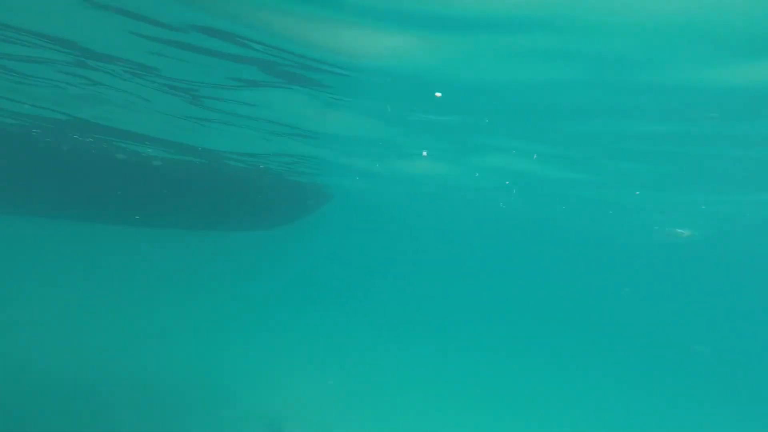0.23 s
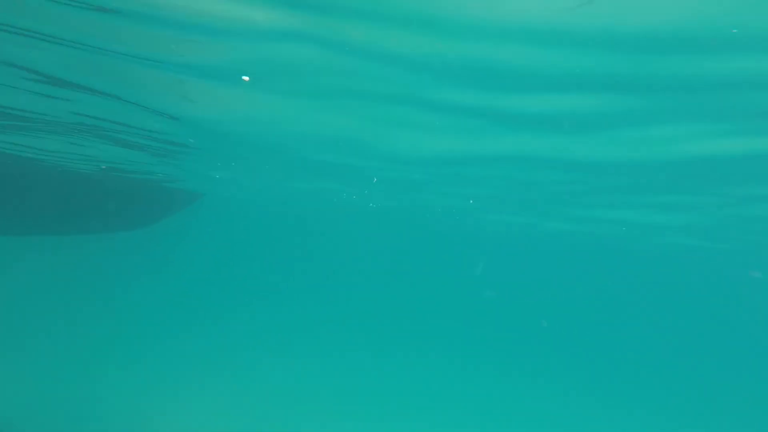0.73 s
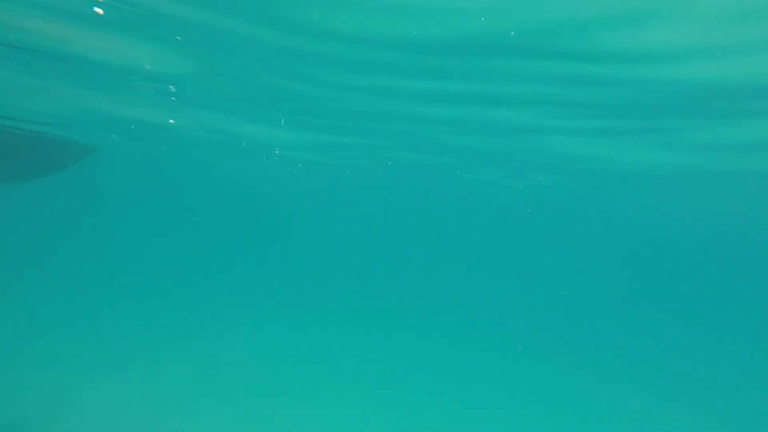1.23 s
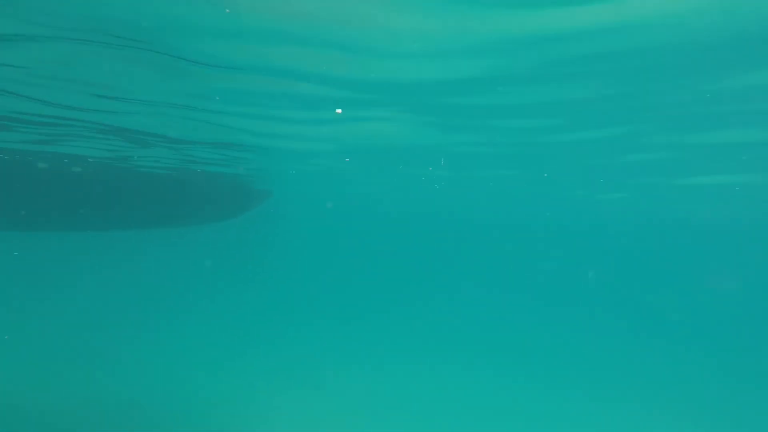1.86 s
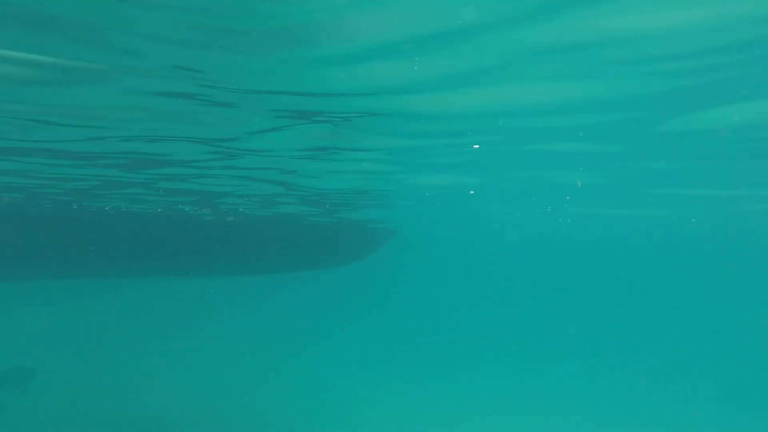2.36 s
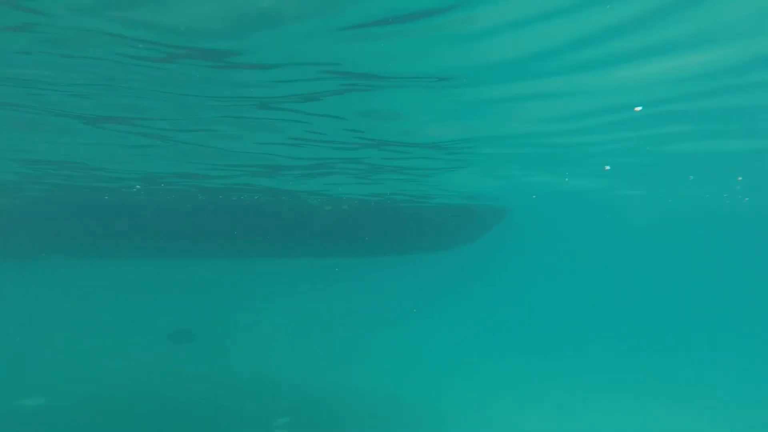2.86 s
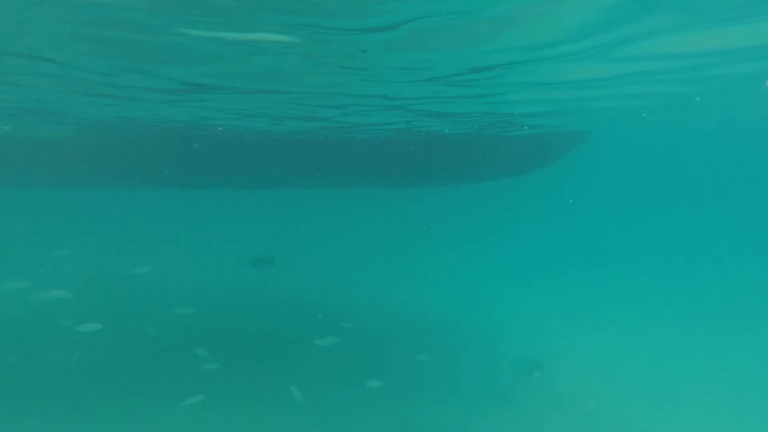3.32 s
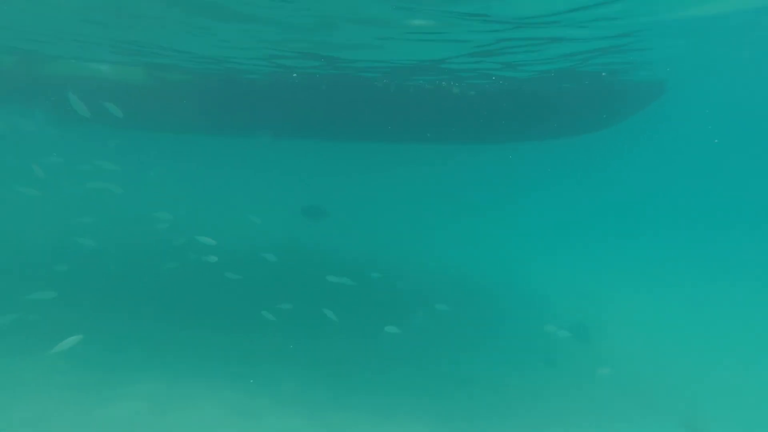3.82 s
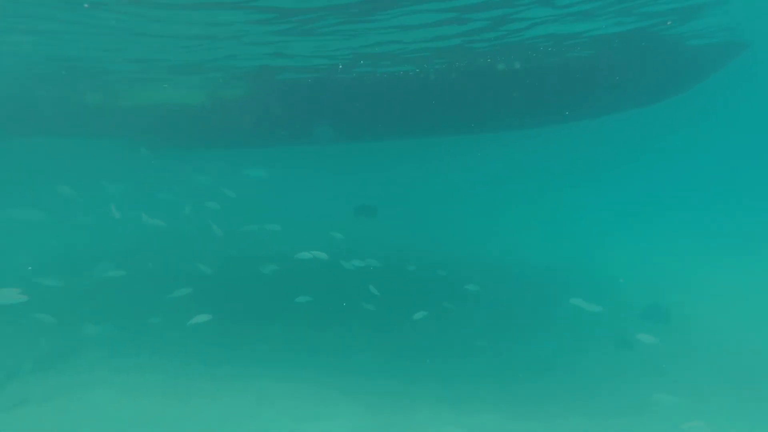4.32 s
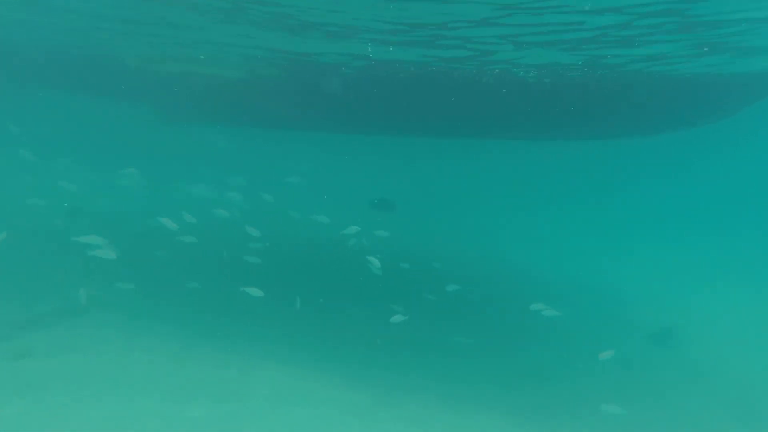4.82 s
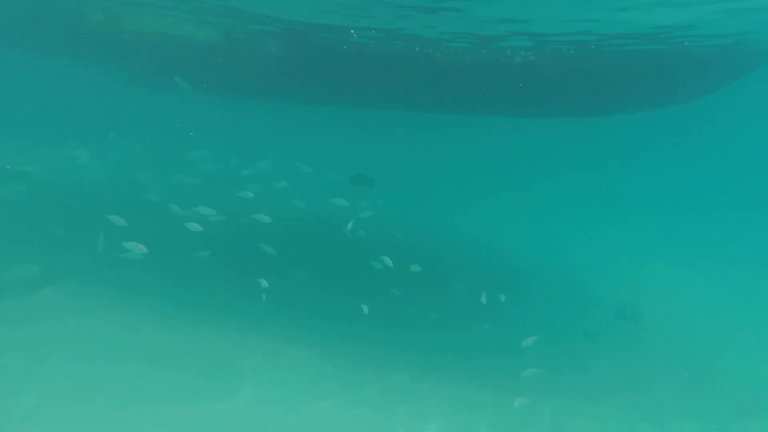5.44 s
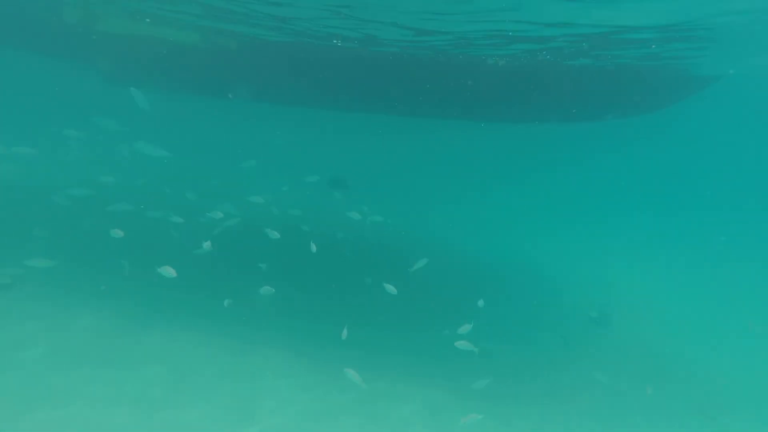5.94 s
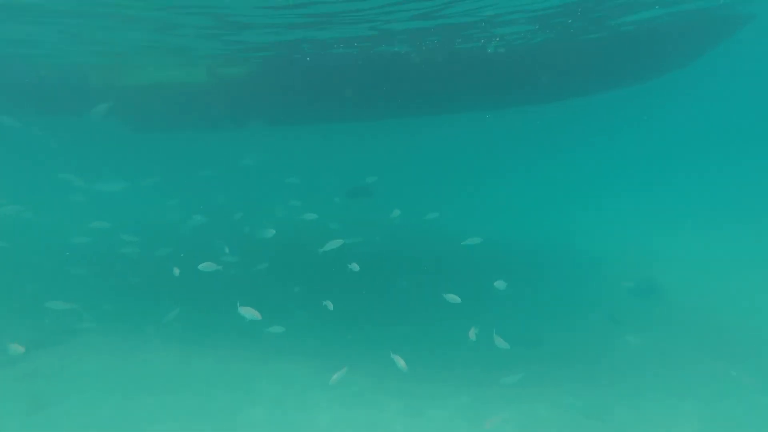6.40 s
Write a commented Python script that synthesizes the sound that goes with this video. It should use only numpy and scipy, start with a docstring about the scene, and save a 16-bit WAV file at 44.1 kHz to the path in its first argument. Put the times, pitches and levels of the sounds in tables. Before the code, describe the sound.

Deep, muffled motor hum with a slow beating pulse under water, interrupted by a few seconds of hollow gurgling, crackling bubbles and a small slap.

```python
"""Under water beside a boat

Distant engines drone and throb, and water rumbles round a camera in its housing: beating tones and coloured noise.
From about 1.2 to 5 s water gurgles and crackles: swarms of short rings pass through a housing wall that
colours each microphone differently. Dull bumps push the camera now and then, the last one near the end.
The microphones hiss faintly and the camera turns down loud moments."""
import sys
import numpy as np
from scipy import signal
from scipy.fft import rfft, irfft, next_fast_len
from scipy.io import wavfile
from scipy.ndimage import uniform_filter1d, minimum_filter1d, map_coordinates

SR = 44100
rng = np.random.default_rng(int(sys.argv[2]) if len(sys.argv) > 2 else 0)


def to_wav(sig):
    """Store sig (one row per channel, or 1-D mono) as 16-bit WAV at the path in sys.argv[1].

    Samples outside -1..1 are clipped; the rate is SR.
    """
    pcm = np.clip(np.atleast_2d(sig), -1, 1) * 32767
    pcm = np.round(pcm).astype(np.int16)
    wavfile.write(sys.argv[1], SR, pcm.T)  # frames by channels


N = 294147
T = np.arange(N) / SR

# loudness of the engines over time: t/s, firing tone level/dB, level of the rest/dB
ENGINE_LEVELS = [(0, -22.5, -29), (1.0, -23.5, -32), (2.05, -17, -28), (2.5, -27, -26.5), (3.0, -15.5, -28),
                 (3.45, -15.5, -25), (4.2, -20, -28), (5.0, -28.5, -35), (6.67, -30, -36)]
# how the housing wall colours each microphone: f/Hz, left gain/dB, right gain/dB
HOUSING_WALL = [(119, -18.5, -37.5), (293, -30, -31), (439, -24, -10.5), (705, -14.5, -20.5),
                (799, -1.5, -7), (885, -1, -8.5), (1040, -17, -33.5), (1193, -11, -14.5),
                (1700, -34.5, -26), (2227, -21.5, -19.5), (2730, -34, -33.5), (3500, -44.5, -48.5),
                (6600, -61.5, -46), (9500, -48.5, -46), (12900, -68.5, -73)]


def amp(db):
    """Turn decibels into a plain gain."""
    return 10 ** (np.asarray(db) / 20)


def unit(x):
    """Scale x to an rms (average strength) of 1."""
    return x / np.sqrt(np.mean(x ** 2) + 1e-20)


def along(points, hz):
    """Read a curve of (Hz, value) points on a log frequency axis."""
    f, v = np.transpose(points)
    return np.interp(np.log(hz + 1), np.log(f + 1), v)


def curves(rows):
    """Draw each column after the time as a curve with one value per sample."""
    s, *cols = np.transpose(rows)
    return [np.interp(T, s, c) for c in cols]


def wobble(rate):
    """A smooth curve through random points, rate of them a second; it repeats after 400 points."""
    return map_coordinates(rng.standard_normal(400), [T * rate + 2], mode="wrap")


def filtered(x, response):
    """Filter x by multiplying its spectrum by a response to frequency."""
    size = next_fast_len(N + SR // 2)
    hz = np.fft.rfftfreq(size, 1 / SR)
    return irfft(rfft(x, size) * response(hz), size)[..., :N]


def noise(spectrum, side_db):
    """Coloured stereo noise of rms 1; more side level makes the two channels differ more."""
    mid, side = filtered(rng.standard_normal((2, N)), lambda hz: amp(along(spectrum, hz)))
    side = amp(side_db) * side
    return unit(np.array([mid + side, mid - side]))


def carrier(pitch_hz):
    """A steadily turning phasor (a complex tone) that starts at a random angle."""
    turns = np.cumsum(np.broadcast_to(pitch_hz, N)) / SR
    return np.exp(2j * np.pi * (turns + rng.random()))


def heard(phasor, fade, rate):
    """A stereo tone of rms 1; reflections off the waves make it fade at each microphone."""
    paths = np.array([1 + fade * (wobble(rate) + 1j * wobble(rate)) for _ in range(2)])
    return unit((phasor * paths).real)


def add(track, s, sound):
    """Mix a sound into the track at time s."""
    part = track[..., max(round(s * SR), 0):][..., :sound.shape[-1]]
    part += sound[..., :part.shape[-1]]


def blip(t, hz, swell, glide, steep=2):
    """A bubble's ring: it swells for `swell` seconds, dies and glides in pitch; less steep, longer tail."""
    u = t / swell
    envelope = (u * np.exp(1 - u)) ** steep  # reaches 1 at u = 1
    return envelope * np.sin(2 * np.pi * hz * t * (1 + glide * (u - 2) / 2))


def swarm(rate, pitch_hz, spread, cycles, size_db, glide=.01):
    """Random bubbles, rate a second, of scattered pitch and size; some glide up, some down; rms 1."""
    count = int(rate * N / SR)
    when, pitch, size, life, bend = rng.random((count, 5)).T[:, :, None]
    hz = pitch_hz * np.exp(spread * np.clip(np.log(pitch / (1 - pitch)), -4, 4))
    steps = np.arange(min(int(9 * cycles / pitch_hz * SR), SR // 10))
    swell = cycles * (.5 + life) / hz  # on average `cycles` periods of the ring
    gain = amp(-size_db * np.log(1 - .97 * size))  # many small bubbles, few big ones
    rings = gain * blip(steps / SR, hz, swell, glide * (2 * bend - 1))
    places = (when * N).astype(int) + steps
    return unit(np.bincount(places.ravel(), rings.ravel(), N)[:N])


def housing(x, lag=.0001):
    """The wall rings after each push; it rocks, so the two microphones move in opposite senses."""
    def response(hz):
        log_gain = np.log(amp([along(np.array(HOUSING_WALL)[:, [0, c]], hz) for c in (1, 2)]))
        size = 2 * (len(hz) - 1)
        # minimum phase: the ringing only follows the push
        causal = np.exp(rfft(irfft(log_gain) * (1 + np.sign(np.fft.fftfreq(size)))))
        # the right side is turned over and comes `lag` seconds later
        return causal * [np.ones(len(hz)), -np.exp(-2j * np.pi * hz * lag)]
    return filtered(x, response)


def hiss():
    """Faint noise of the microphones, nearly the same in both."""
    # colour of the hiss: f/Hz, relative level per Hz/dB
    hiss_colour = [(2500, -4.5), (3400, -15.5), (5400, -7.5), (7000, -9.5), (8900, -1.5), (11000, -7.5),
                   (13000, -14.5), (15000, -22.5)]
    return amp(-59.5) * noise(hiss_colour, side_db=-31)


def water():
    """Slow eddies round the camera: a deep rumble and a higher churn, both coloured noise."""
    # strength of the eddies: t/s, rumble level/dB, churn level/dB
    eddy_levels = [(0, -19.5, -29.5), (0.85, -26, -29), (1.55, -14, -26.5), (2.0, -17, -27.5),
                   (2.5, -20.5, -27.5), (3.7, -20.5, -19.5), (4.2, -20, -31), (4.85, -22, -33),
                   (5.7, -23.5, -30), (6.67, -22, -37)]
    # colour of the rumble: f/Hz, relative level per Hz/dB
    rumble_colour = [(12, -12.5), (25, -6), (45, -11), (75, -11.5), (100, -14.5), (140, -37.5),
                     (300, -51.5), (600, -120)]
    # colour of the churn: f/Hz, relative level per Hz/dB
    churn_colour = [(40, -32), (80, -1), (130, -0.5), (200, -6), (270, -8.5), (350, -20), (500, -54.5),
                    (2000, -120)]
    rumble_db, churn_db = curves(eddy_levels)
    rumble = amp(rumble_db) * noise(rumble_colour, side_db=-1.0)
    churn = amp(churn_db) * noise(churn_colour, side_db=1.0)
    return rumble + churn


def hum(hz=75.2):
    """A low machinery tone swells twice."""
    # loudness of the hum: t/s, level/dB
    hum_levels = [(1.35, -32), (1.95, -19.5), (2.6, -28), (3.3, -30), (3.7, -20.5), (4.2, -40)]
    hum_db, = curves(hum_levels)
    return amp(hum_db) * heard(carrier(hz), fade=0.22, rate=2.17)


def throb(firing_hz=102.9, beat_hz=2.597, first_lull_s=.37, second_db=-8.0):
    """Two engines fire at nearly the same rate; their tone sinks each time they fall out of step."""
    drone_db, _ = curves(ENGINE_LEVELS)
    second = amp(second_db) * np.exp(2j * np.pi * beat_hz * (T - first_lull_s))
    pair = carrier(firing_hz) * (1 - second)
    return amp(drone_db) * heard(pair, fade=0.16, rate=4.11)


def engines(shaft_hz=26.29):
    """Tones at multiples of the shaft's speed, machinery whine and the noisy wash of the propeller."""
    # shaft tones: multiple of the shaft speed, relative level/dB
    shaft_orders = [(2, 4.5), (3, 4.5), (5, -2), (6, 3), (8, -1), (10, -9), (12, -11), (16, -15), (18, -13)]
    # machinery hums and thin tones: f/Hz, relative level/dB
    whine_tones = [(82.4, -9.5), (214.6, -9.5), (254.3, -16.5), (324.6, -15.5), (598, -23), (650, -20.5)]
    # colour of the propeller wash: f/Hz, relative level per Hz/dB
    wash_colour = [(100, -32), (300, 2), (460, 2.5), (540, -7), (660, 1.5), (800, -2.5), (1020, -14),
                   (1220, -13), (1700, -22), (2400, -43), (3300, -62), (6000, -81)]
    _, engine_db = curves(ENGINE_LEVELS)
    speed = shaft_hz * (1 + 0.0032 * wobble(2.011))
    # short waves fade far more than long ones
    orders = sum(amp(db) * heard(carrier(k * speed), fade=(k / 12) ** 3, rate=6) for k, db in shaft_orders)
    whine = sum(amp(db) * heard(carrier(hz), fade=hz / 600, rate=5) for hz, db in whine_tones)
    # the wash swells with every turn of the shaft
    beat = 1 + 0.15 * carrier(speed).real
    wash = amp(-9.5) * beat * noise(wash_colour, side_db=-3.0)
    return amp(engine_db) * (whine + amp(-6.0) * orders + wash)


def bumps():
    """Dull pushes move the whole camera, so both microphones get the same short low ring."""
    # soft bumps: t/s, ring level/dB, f/Hz, swell time/s
    bump_list = [(1.123, -11, 27, 0.021), (1.411, -8, 120, 0.0015), (3.099, -2.5, 250, 0.0014),
                 (3.104, -3, 115, 0.0022), (4.336, -20.5, 268, 0.011), (4.777, -17, 35.7, 0.016),
                 (6.569, -12, 266, 0.0028)]
    track, t = np.zeros(N), np.arange(SR // 10) / SR
    for s, db, hz, swell in bump_list:
        add(track, s, amp(db) * blip(t, hz, swell, glide=0))
    return track


def snaps(echo_s=0.0007, direct_db=-62, ring_swell=0.00024, tail_db=-27, tail_t60=0.54,
          knock_db=-8, knock_db_per_octave=-24):
    """Each snap is a tiny high ring and a crack around its pitch, over a knock that grows the lower it is.
    It comes again, louder, from the far wall; a little passes straight through."""
    # loudest snaps: t/s, relative ring level/dB, f/Hz, relative crack level/dB
    snap_list = [(1.3457, -35, 3920, 2), (1.7678, -36, 4570, 9.5), (1.8841, -23.5, 3630, 29.5),
                 (2.0994, -14, 5440, 16.5), (2.1442, -28, 5800, 4), (2.2053, -37, 6400, 12),
                 (2.381, -31, 7000, 8), (2.406, -31, 7240, 6), (2.4893, -27, 5400, 13),
                 (2.656, -31, 5910, 1), (3.0829, -25.5, 5900, 10), (3.2366, -34, 4290, 19),
                 (3.3153, -33, 6200, 14), (3.423, -29.5, 4100, 15.5), (3.5206, -30, 6400, 11.5),
                 (4.1532, -28, 5600, 9), (4.306, -56, 3900, 9), (4.9857, -36, 8740, 3.5)]
    track, t = np.zeros(N), np.arange(SR // 8) / SR
    highs = signal.butter(3, [2900, 14000], "band", fs=SR, output="sos")
    wall = np.array(HOUSING_WALL)[:, ::2]  # right microphone
    # three decays, each falling 60 dB in its own time: a click, a short ring-out and a weak long tail
    decay = amp(-60 * t / 0.0022) + amp(1.5 - 60 * t / 0.03) + amp(tail_db - 60 * t / tail_t60)
    for s, ring_db, hz, crack_db in snap_list:
        colour = signal.butter(1, [hz * .7, hz * 1.5], "band", fs=SR, output="sos")
        burst = decay * rng.standard_normal(len(t))
        crack = amp(crack_db) * signal.sosfilt(np.vstack([highs, colour]), burst)
        # the wall's own gain is taken off before the wall is applied
        ring = amp(ring_db - along(wall, hz)) * blip(t, hz, ring_swell, glide=0, steep=1.0)
        knock_gain = amp(crack_db + knock_db + knock_db_per_octave * np.log2(hz / 4000))
        knock = knock_gain * blip(t, 2300, 0.0002, glide=0)
        snap = amp(4.2) * (ring + crack + knock)
        add(track, s, amp(-13.0) * snap)
        add(track, s + echo_s, snap)
    return housing(track) + amp(direct_db) * track


def surge(s=3.1, t60=1.17):
    """A small wave slaps the housing and rushes off along it, spluttering: fading noise through the wall."""
    age = np.maximum(T - s, 0)
    # f/Hz, relative level per Hz/dB
    rush_colour = [(100, 0.5), (250, 4.5), (450, -2.5), (650, -7.5), (900, -13.0), (2500, -21.5), (5000, -26.0)]
    rush = unit(housing(noise(rush_colour, side_db=0.5)[0]))
    fading = amp(-4 - 60 * age / t60 + 2.7 * wobble(110))
    onset = 1 - np.exp(-age / 0.0017)
    return fading * onset * rush


def bubbles(pinch_db=-5):
    """Loud single bubbles pinch off with a tick, then ring and sag in pitch; abrupt ones tick hardest."""
    # loudest bubbles: t/s, relative level/dB, f/Hz, swell time/s
    bubble_list = [(1.443, -36, 2060, 0.0021), (1.456, -6, 835, 0.00057), (1.538, -34, 2810, 0.00092),
                   (1.544, -4.5, 923, 0.00033), (1.544, -24.5, 1920, 0.00086), (1.563, -21.5, 1110, 0.005),
                   (1.622, 0, 921, 0.00037), (1.682, -17, 900, 0.0027), (1.697, -22.5, 1062, 0.0056),
                   (1.701, -12.5, 778, 0.0032), (1.7323, -37, 2180, 0.0022), (1.755, -11, 845, 0.0013),
                   (1.776, -19.5, 700, 0.0038), (1.796, -23, 730, 0.0037), (1.827, -9.5, 817, 0.0042),
                   (1.885, -8, 875, 0.00082), (1.938, -28.5, 437, 0.0024), (1.951, -25, 2310, 0.0021),
                   (2.026, -32, 1420, 0.0034), (2.302, -21, 1070, 0.0035), (2.305, -9, 886, 0.002),
                   (2.364, -9.5, 916, 0.0013), (2.397, -10.5, 910, 0.002), (2.413, -6, 847, 0.0017),
                   (2.439, -10, 850, 0.0012), (2.478, -6.5, 893, 0.001), (2.479, -16.5, 1086, 0.0022),
                   (2.530, -11.5, 874, 0.0039), (2.542, -20.5, 1120, 0.0056), (2.7061, -4.5, 917, 0.00052),
                   (2.782, -26, 2270, 0.0011), (2.834, -33, 2330, 0.0013), (2.841, -9.5, 906, 0.0012),
                   (2.881, -5.5, 810, 0.00087), (2.958, -23.5, 423, 0.0018), (2.989, -31, 445, 0.0015),
                   (3.0119, -20.5, 1430, 0.00056), (3.016, -24.5, 400, 0.005), (3.049, -9, 929, 0.0066),
                   (3.099, -16, 470, 0.0013), (3.108, -19, 585, 0.0032), (3.238, -8.5, 1340, 0.00084),
                   (3.239, -9, 2110, 0.00038), (3.3252, -28.5, 2370, 0.001), (3.356, -18.5, 2180, 0.00044),
                   (3.367, -26, 1586, 0.0038), (3.6141, -22.5, 2180, 0.00075), (3.673, -25.5, 2020, 0.0019),
                   (3.674, -4, 915, 0.0011), (3.718, -9, 980, 0.0015), (3.746, 1.5, 860, .0011),
                   (3.749, -25.5, 2000, 0.0014), (3.863, -6.5, 800, 0.0012), (4.051, -1.5, 810, 0.0011),
                   (4.157, -12, 844, 0.0012), (4.211, -22.5, 973, 0.0033), (4.333, -25, 846, 0.011),
                   (4.509, -20, 818, 0.0031), (4.773, -32.5, 1077, .0011), (4.901, -35.5, 986, 0.00092),
                   (4.958, -56, 2590, 0.00077)]
    track, t = np.zeros(N), np.arange(SR // 12) / SR
    wall = np.array(HOUSING_WALL)[:, :2]  # left microphone
    for s, db, hz, swell in bubble_list:
        # the wall's own gain is taken off before the wall is applied
        ring_gain = amp(db - along(wall, hz) + 10.0)
        tick_gain = amp(db + pinch_db) * 0.0014 / swell
        add(track, s, ring_gain * blip(t, hz, swell, glide=-0.02, steep=0.91))
        add(track, s, tick_gain * blip(t, 2340, 0.00079, glide=0))
    return housing(track)


def gurgle():
    """Bubbles of several sizes run together along the wall over crackling froth; a few ring alone and glide."""
    # water washing over the housing: t/s, gurgle base level/dB, fizz base level/dB
    wash_levels = [(1.25, -37, -62.5), (1.65, -29.5, -50.5), (1.76, -22, -55), (2.2, -27, -52.5),
                   (2.5, -23.5, -50), (2.66, -28, -49.5), (3.02, -23, -43), (3.4, -20.5, -39),
                   (3.72, -18.5, -40), (4.05, -22.5, -46), (4.27, -32.5, -58.5), (4.8, -48.5, -75)]
    gurgle_db, fizz_db = curves(wash_levels)
    wet = np.interp(T, [1.2, 1.4, 4.6, 5], [0, 1, 1, 0])
    clumps_db = 1.68 * wobble(21.915)

    def on_wall(db, source):
        return amp(db) * unit(housing(source))

    middling = on_wall(gurgle_db + 4, swarm(
        rate=380, pitch_hz=1014, spread=0.1774, cycles=3.02, size_db=0.5, glide=0.054))
    large = on_wall(gurgle_db - 5, swarm(rate=240, pitch_hz=413.4, spread=0.154, cycles=1.8, size_db=2.0))
    small = on_wall(fizz_db + 8.5, swarm(rate=700, pitch_hz=2197, spread=0.1934, cycles=3, size_db=2.0))
    lone = on_wall(gurgle_db - 6.5, swarm(
        rate=24, pitch_hz=964.5, spread=0.085, cycles=9, size_db=3.5, glide=0.045))
    pings = on_wall(fizz_db, swarm(
        rate=16, pitch_hz=2153, spread=0.087, cycles=10.6, size_db=7, glide=0.028))
    # crackle and froth follow the fizz less strongly
    ticks = swarm(rate=240, pitch_hz=5700, spread=.075, cycles=1.1, size_db=3.6)
    crackle = on_wall(0.36 * fizz_db - 33.5, ticks)
    # f/Hz, relative level per Hz/dB
    froth_colour = [(1500, -53.0), (3000, -10.0), (5000, -5.0), (7500, -6), (12000, -10.5)]
    froth = on_wall(0.43 * fizz_db - 34.5, noise(froth_colour, side_db=-20.0)[0])
    clumped = amp(clumps_db) * (middling + large + small + crackle)
    return wet * (clumped + lone + pings + froth)


def scene():
    """Everything at the two microphones."""
    background = hiss() + water() + hum() + throb() + engines()
    return background + bumps() + snaps() + surge() + bubbles() + gurgle()


def record(dry, top_db=-3.0, hold_s=0.066, knee_db=-32, slope=0.3, top_hz=15200):
    """The camera eases the level down while the water is busy, hiss and all, and catches loud peaks;
    nothing is kept above top_hz."""
    mids = filtered(dry, lambda hz: hz > 500)
    # strength above 500 Hz, averaged over a fifth of a second
    busy = np.sqrt(np.abs(uniform_filter1d(np.mean(mids ** 2, axis=0), SR // 5)))
    eased = dry * (1 + busy / amp(knee_db)) ** -slope
    # the gain that would keep every peak under top_db, held and then smoothed
    needed = np.minimum(1, amp(top_db) / (np.abs(eased).max(axis=0) + 1e-9))
    span = int(hold_s * SR)
    held = minimum_filter1d(needed, span, origin=span * 4 // 9)
    gain = uniform_filter1d(held, span // 4)
    return filtered(eased * gain, lambda hz: hz < top_hz)


dry = scene()
out = record(dry)
to_wav(out)
```